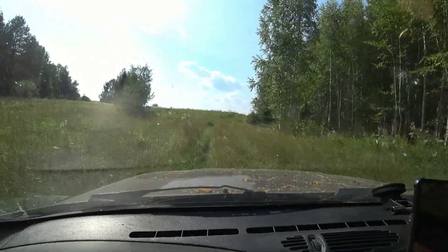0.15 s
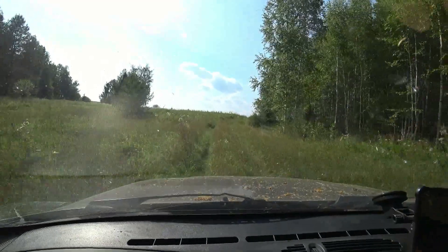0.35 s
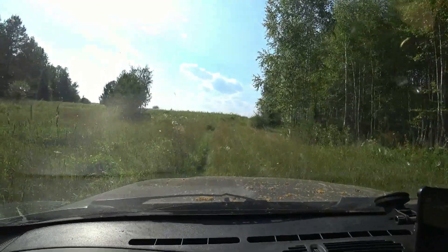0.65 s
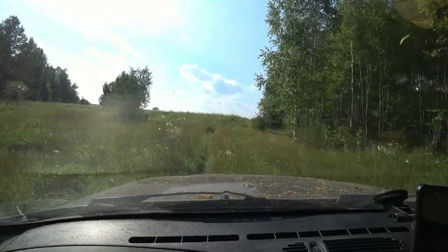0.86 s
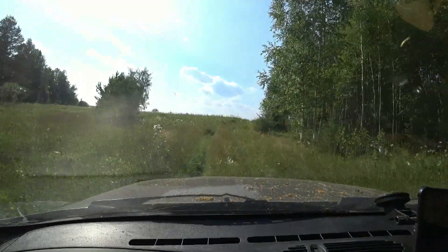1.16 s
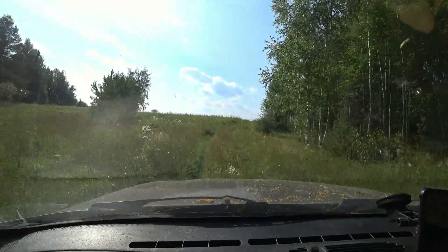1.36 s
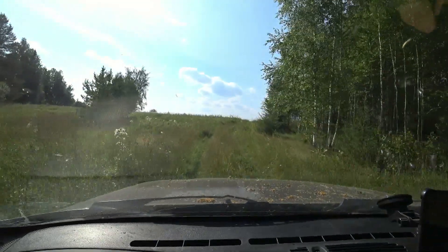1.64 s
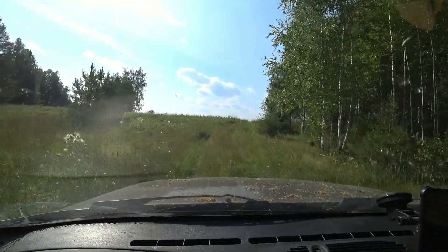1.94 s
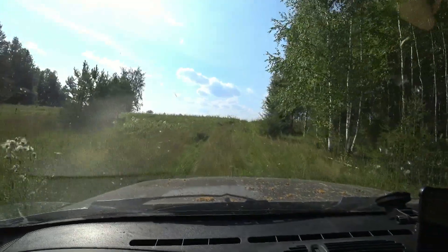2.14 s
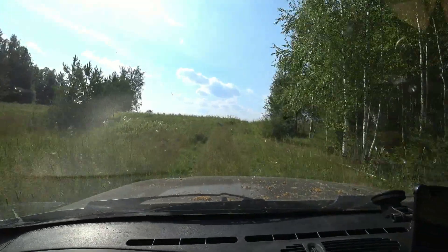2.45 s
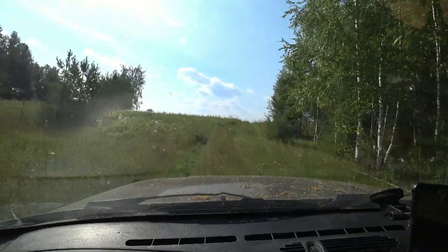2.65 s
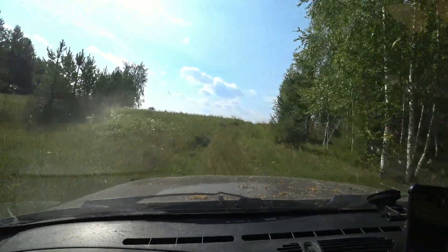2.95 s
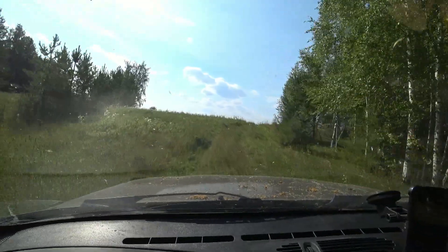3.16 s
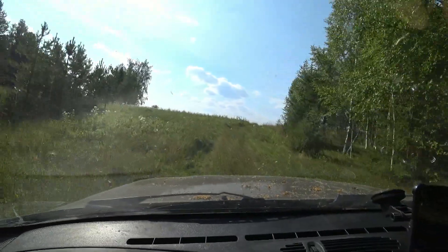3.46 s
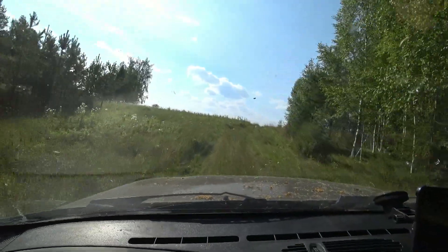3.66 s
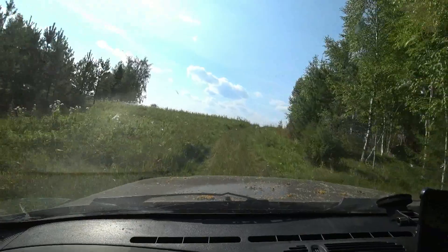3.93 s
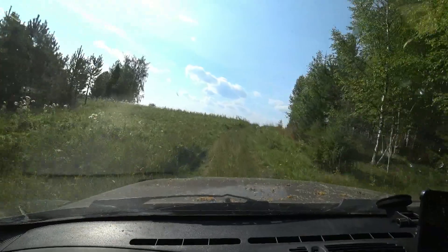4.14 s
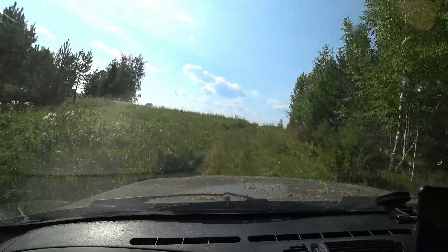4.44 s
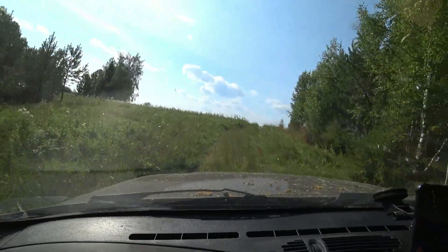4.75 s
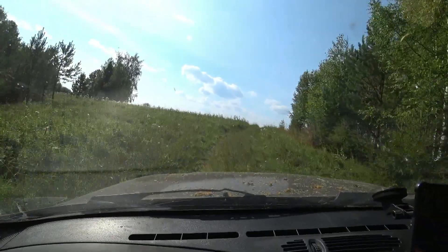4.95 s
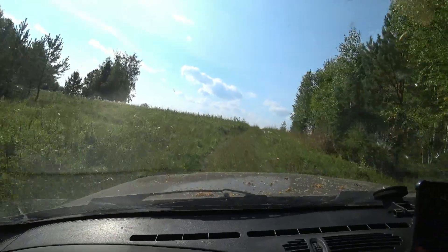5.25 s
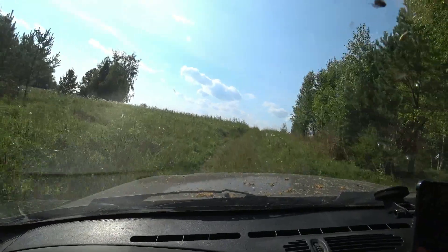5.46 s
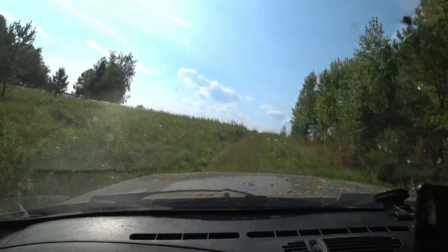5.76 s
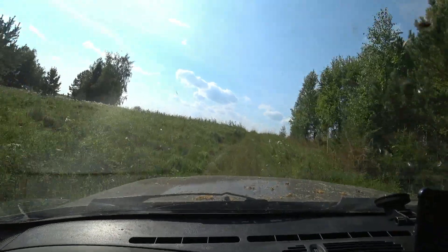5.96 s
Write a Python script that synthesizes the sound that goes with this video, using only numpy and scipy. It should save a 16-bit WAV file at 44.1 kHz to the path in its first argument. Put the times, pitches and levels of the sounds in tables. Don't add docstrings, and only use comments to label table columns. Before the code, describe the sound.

Inside a car crawling over a rough grassy track, low engine boom and wavering gear whine, with hard trim knocks, rattles and rumbling tyres.

```python
import sys
import numpy as np
from scipy import signal
from scipy.io import wavfile

SR = 44100
rng = np.random.default_rng(int(sys.argv[2]) if len(sys.argv) > 2 else 0)


def ratio_of_db(decibels):
    return 10 ** (np.asarray(decibels, float) / 20)


def file_out(sig):
    cols = np.atleast_2d(sig).T
    lim = np.clip(cols, -1, 1)
    pcm = np.round(lim * 32767).astype(np.int16)
    wavfile.write(sys.argv[1], SR, pcm)


N = 269010

# (time [s], mesh rate [Hz])
MESH_SPEED = [(0, 337), (.2, 328.6), (.6, 319), (1, 309.7), (1.4, 297.4), (2, 285.5), (2.4, 277),
              (2.8, 281), (3.2, 289.5), (3.6, 291.5), (4, 300), (4.4, 307.5), (4.7, 308), (4.85, 310.5),
              (5.17, 313), (5.45, 303), (5.8, 303), (6.1, 297)]
# (time [s], boom level [dB])
ENGINE_LOAD = [(0, -24), (.5, -20.5), (.8, -26.5), (1.2, -24.5), (1.5, -20.5), (2, -21.5), (2.4, -15),
               (2.9, -13.5), (3.6, -15), (4.3, -14), (5, -13), (5.5, -13.5), (6.1, -15.5)]
# (time [s], change [dB])
RUTS = [(.08, 3), (.2, -15), (.29, 5), (0.359, -12), (.44, 8), (.69, -16), (.98, -1), (1.15, 10.5),
        (1.42, -5), (1.63, -6), (1.72, 6), (1.801, -11), (1.87, 5), (1.95, -11), (2.16, 3), (2.28, -2.5),
        (2.36, -0.5), (2.49, -3.5), (2.58, 3.5), (2.66, -4.5), (4.38, -2.5), (4.62, -6.5), (4.68, 3.5),
        (4.88, -9.5), (5.1, -7.5), (5.37, -24), (5.61, -3), (5.84, -3.5), (6.03, -1)]
# (octave frequency [Hz], level re boom [dB])
CABIN_OCTAVE = [(59, -5), (62, -5.5), (64.5, -8.5), (66, -16), (68, -17), (72, -8)]
# (time [s], whine level [dB], depth of the dip in each shaft turn [dB])
GEAR_CONTACT = [(0, -28, -9), (.3, -29.5, -15), (.75, -28, -10), (.95, -25.5, -1), (1.25, -20, -6),
                (1.5, -21.5, -2.5), (2.1, -21, -1), (2.35, -26, -3), (2.9, -29.5, -11), (3.25, -28, -24),
                (3.45, -26.5, -2), (3.85, -25, -14), (4.4, -24, -17), (4.65, -23.5, -2), (4.95, -24.5, -13),
                (5.15, -24, 2), (5.6, -21.5, -5), (5.85, -21, -2)]
# (time [s], loss [dB])
SLACK = [(.26, -12), (.74, -14), (1.245, -9), (2.31, -8), (2.47, -10), (2.58, -19), (2.87, -8), (3.02, -17),
         (3.25, -14), (3.95, -8), (4.85, -16), (5.09, -7), (5.364, -14), (5.484, -7), (5.614, -9),
         (6.0, -32)]
# (mesh rate [Hz], left minus right [dB])
WHINE_LEAN = [(277, -3.5), (290, -8), (300, -7), (312, -3.5), (335, -1.5)]
# (mesh rate [Hz], left lead [rad])
WHINE_LEAD = [(277, 2.45), (290, 1.82), (305, 1.22), (320, .95), (337, .45)]
# (time [s], peak [dB], thump re peak [dB], crack re peak [dB])
KNOCKS = [(0.013, -3.5, -7.5, -21.5), (0.044, -11.5, -0.5, -22), (0.233, -20, 2.5, -28),
          (0.752, -20.5, -11, -25), (0.839, -6, -8, -23), (0.936, -20, -4, -22), (1.432, -7.5, -7, -19.5),
          (1.459, -15.5, -0.5, -29), (1.851, -25.5, -15, -21), (2.133, -20.5, -3.5, -17),
          (2.307, -20.5, -29, -35), (2.445, -17, -21, -32), (2.945, -12, -7.5, -27), (3.1, -14, -13, -36),
          (3.199, -19.5, -17, -36), (3.805, -23, -6, -22), (3.861, -23.5, -20, -33),
          (4.476, -11, -6.5, -30), (4.738, -22, -10, -37), (4.828, -20.5, -10, -20), (4.873, -21, -12, -33),
          (4.978, -12, -8.5, -39), (5.291, -19.5, -17, -20), (5.39, -12, -11, -33),
          (5.694, -6.5, -7, -20.5), (5.711, -16, -13, -24), (5.803, -9, -13, -18.5),
          (5.822, -19.5, 3.5, -18), (5.864, -21.5, -3, -30), (6.01, -22.5, -19.5, -27)]
# (frequency [Hz], level [dB], T60 [s])
PANEL_MODES = [(388.8, -5.5, 0.17), (411.7, -4, 0.13), (451.6, -5, 0.064), (522, -4, 0.033),
               (549.4, -6.5, .11), (626, -12, 0.064), (639.5, -14, 0.16), (982, -6, 0.044),
               (1110, -33, 0.059), (1257, -11, 0.036), (1347, -23, 0.1)]
# (frequency [Hz], level [dB], T60 [s])
FLOOR_MODES = [
    (154.6, -4, 0.38),
    (183.6, 4.5, 0.19),
]
# (time [s], peak [dB], ring [Hz], broad snap re ring [dB])
TICKS = [(0.492, -38.5, 1780, -7), (0.691, -46, 4230, 9), (0.702, -39, 1930, -2.5), (0.75, -41, 4570, -5),
         (0.889, -40.5, 2700, -5), (0.994, -40.5, 1830, -6), (1.092, -45, 7060, -3),
         (1.196, -44, 4680, -14), (1.499, -44, 6200, -4), (2.013, -44.5, 4430, 2), (2.036, -41.5, 3300, -1),
         (2.146, -33, 3600, -7), (2.196, -40, 5800, -6), (2.339, -36.5, 1640, -17), (2.501, -45, 4050, -4),
         (2.871, -32.5, 6340, -3.5), (2.91, -51, 7700, 14), (3.064, -45, 5300, -6),
         (3.557, -50.5, 6460, 8.5), (3.625, -40, 3320, -7), (4.127, -50, 6700, 8.5),
         (4.414, -43, 3190, -18), (4.574, -45, 3570, -14), (4.849, -38, 2780, -9), (5.047, -49.5, 2800, -8),
         (5.231, -45, 3544, -6), (5.287, -40.5, 5900, 1), (5.348, -38.5, 2760, -9), (5.897, -50, 4480, 4),
         (6.008, -39, 2670, -3.5)]
# (frequency [Hz], level [dB], T60 [s])
DASH_MODES = [(1650, -3, 0.037), (2260, -4, 0.023), (2760, -1, 0.033), (3270, 3.5, 0.029), (3520, 2, 0.02),
              (4630, -13.5, 0.017), (5660, -3, .03), (6200, 1.5, 0.027), (7300, -2, .03)]
# (time [s], level [dB])
ROUGHNESS = [(0, 8), (.1, 6), (.4, 6), (.55, 3), (.95, 3), (1.25, 3.5), (1.9, -1), (2.4, 3), (2.95, -2),
             (3.5, -3), (4.1, -2), (4.4, -3.5), (5.3, -0.5), (5.8, -3), (6.1, -3)]
ROUGHNESS_SHARE = [.3, 0.37, 0.65, 1.07]
# (time [s], swell [dB])
HUMPS = [
    (.03, 8.5),
    (.9, 2.5),
    (2.15, 3),
    (2.47, 3.5),
    (3.75, 3),
    (4.1, -2),
    (4.42, 2),
    (4.95, 1),
    (5.75, 4),
    (5.95, 1),
]
# (frequency [Hz], density [dB per Hz])
ROAD_COLOUR = [(82, -11), (110, -8.5), (190, -7.5), (250, -17), (320, -12), (420, -19), (680, -20.5),
               (830, -24.5), (1050, -26.5), (2200, -43.5), (3300, -44), (6300, -47), (8500, -50),
               (11200, -54)]
# (frequency [Hz], left-right likeness [0-1])
ROAD_LIKENESS = [(60, 0.66), (140, 0.78), (340, 0.26), (800, 0.53), (1910, 0.26), (4550, 0.6),
                 (10800, 0.38)]
# (frequency [Hz], left minus right [dB])
ROAD_LEAN = [(60, 6), (140, -6), (340, -2.5), (800, -1), (1910, 2), (4550, 0), (10800, 2)]
# (time [s], level [dB])
HEAVE = [(0, -26), (1, -21), (2, -23.5), (2.6, -31.5), (4.2, -23.5), (5, -22.5), (6.1, -26)]


def curves(rows):
    s, *columns = np.transpose(rows)
    return [np.interp(np.arange(N) / SR, s, column) for column in columns]


def at_hz(points, hz):
    table = np.array(points)
    return np.interp(np.log(hz), np.log(table[:, 0] + 1), table[:, 1])


def swells(rows, width_s):
    t = np.arange(N) / SR
    return sum(db * np.exp(-.5 * ((t - s) / width_s) ** 2) for s, db in rows)


def unit(x):
    return x / np.sqrt(np.mean(x ** 2) + 1e-20)


def drift(rate):
    r = np.exp(-80 * np.pi * rate / SR)
    slow = signal.lfilter([1], [1, -2 * r, r * r], rng.standard_normal(N // 40 + 2002))
    slow = slow[2000:]
    return np.interp(np.arange(N) / 40, np.arange(len(slow)), unit(slow))


def band(x, low_hz, high_hz, order=2):
    edges_hz = [low_hz, min(high_hz, SR / 2.2)]
    return signal.sosfilt(signal.butter(order, edges_hz, "band", fs=SR, output="sos"), x)


def ring(clicks, hz, t60):
    r, w = ratio_of_db(-60 / (t60 * SR)), 2 * np.pi * hz / SR
    return signal.lfilter([0, np.sin(w)], [1, -2 * r * np.cos(w), r * r], clicks + 1e-18)


def burst(t60):
    t = np.arange(int(.2 * SR)) / SR
    shared, left, right = rng.standard_normal((3, len(t)))
    rise = 1 - np.exp(-t / .0012)
    return (shared + .5 * np.array([left, right])) * ratio_of_db(-60 * t / max(t60, .01)) * rise


def add(out, piece, s):
    start = int(s * SR)
    out[:, start:start + piece.shape[1]] += piece[:, :N - start]


def engine():
    firing_hz = curves(MESH_SPEED)[0] / 9.31
    load_db = curves(ENGINE_LOAD)[0]
    boom_db = load_db + swells(RUTS, width_s=0.036)
    octave_db = load_db + at_hz(CABIN_OCTAVE, 2 * firing_hz + 1) + 1.5 * drift(5.3)
    phase = 2 * np.pi * np.cumsum(firing_hz) / SR + 0.37 * drift(2.3)
    octave_phase = 2 * phase - 2.7 + 0.65 * drift(4.4)
    boom = ratio_of_db(boom_db) * np.cos(phase) + ratio_of_db(octave_db) * np.cos(octave_phase)
    return np.sqrt(2) * boom * ratio_of_db([[-1.3], [1.2]])


def gears():
    teeth, turn_start_rad = 39.1, 2.0
    wobble_rad, wobble_per_s = .9, 7
    swing_rad, swing_start_rad = 0.32, 1.3
    mesh_hz = curves(MESH_SPEED)[0]
    right_db, dip_db = curves(GEAR_CONTACT)
    right_db = right_db + swells(SLACK, width_s=0.014)
    left_db = right_db + at_hz(WHINE_LEAN, mesh_hz + 1)
    lead = at_hz(WHINE_LEAD, mesh_hz + 1)

    steady = 2 * np.pi * np.cumsum(mesh_hz) / SR
    turn = steady / teeth + turn_start_rad
    phase = steady + wobble_rad * drift(wobble_per_s)
    phase = phase + swing_rad * np.sin(turn + swing_start_rad)

    trough = ratio_of_db(np.minimum(dip_db, 0))
    share = (1 - trough) / (1 + trough)
    upper = np.clip(0.7 + 0.45 * drift(1.95), 0, 1)
    sidebands = upper * np.exp(1j * turn) + (1 - upper) * np.exp(-1j * turn)
    tone = np.exp(1j * phase) * (1 + share * sidebands) / np.sqrt(1 + share ** 2)
    haze = ratio_of_db(-42.0) * (drift(12) + 1j * drift(12.3)) * np.exp(1j * 1.07 * phase)
    left = ratio_of_db(left_db) * tone * np.exp(1j * lead) + haze
    right = ratio_of_db(right_db) * tone + haze
    return np.sqrt(2) * np.real([left, right])


def knocks():
    rows, out = np.array(KNOCKS), np.zeros((2, N))
    bounces = ((.0009, -2), (.0031, -0.5), (.0075, -7.5), (.014, -12.5), (.024, -8.5))      # (lag [s], level [dB])
    panel_db = rows[:, 1] - 9.5
    floor_db = rows[:, 1] + rows[:, 2] - 8.5
    for modes, level_db in ((PANEL_MODES, panel_db), (FLOOR_MODES, floor_db)):
        for hz, mode_db, t60 in modes:
            clicks = np.zeros((2, N + 2000))
            for lag_s, bounce_db in bounces:
                chance = rng.normal(0, 1, (len(rows), 5))
                lag = lag_s * (1 + 0.229 * np.tanh(chance[:, 0]))
                at = ((rows[:, 0] + lag) * SR).astype(int)
                size = ratio_of_db(level_db + mode_db + bounce_db + 0.36 * chance[:, 1])
                if lag_s >= .005:
                    size *= np.sign(chance[:, 4])
                clicks[0, at] = size * ratio_of_db(-3.0 + 1.5 * chance[:, 2])
                clicks[1, at] = size * ratio_of_db(2.0 + 2.0 * chance[:, 3])
            out += ring(clicks[:, :N], hz, t60)
    out = signal.lfilter([.22], [1, -.78], out)
    for s, peak_db, _, crack_re_db in KNOCKS:
        crack_db = peak_db + crack_re_db
        add(out, ratio_of_db(peak_db + 6.5) * band(burst(0.18), 313, 533), s)
        add(out, ratio_of_db(peak_db - 12.0) * band(burst(0.081), 480, 1820), s)
        add(out, ratio_of_db(crack_db + 2.5) * band(burst(0.073), 3050, 4530), s)
        add(out, ratio_of_db(crack_db - 2.5) * band(burst(0.058), 5400, 6840), s)
    return out


def ticks():
    out = np.zeros((2, N))
    for s, peak_db, hz, snap_db in TICKS:
        t60 = 0.072 * (4000 / hz) ** 0.4
        puff = burst(t60) * ratio_of_db(peak_db) * np.sqrt(SR / hz)
        resonance = 0.66 * band(puff, hz / 1.21, hz * 1.113)
        snap = ratio_of_db(snap_db - 4.5) * band(puff, 650, 3360, order=1)
        add(out, resonance + snap, s)
    return out


def buzz(per_s, spread_db):
    born = rng.random(N) < per_s * ratio_of_db(5.5 * drift(7)) / SR
    strength = ratio_of_db(spread_db * np.minimum(rng.exponential(1, N), 4))
    touches = born * strength * rng.choice([-1, 1], N)
    dealt = rng.integers(0, len(DASH_MODES), N)
    sides = touches * ratio_of_db(5.4 * rng.normal(0, 1, N) * [[1], [-1]])
    rings = 0
    for k, (hz, db, t60) in enumerate(DASH_MODES):
        rings = rings + ring(ratio_of_db(db) * sides * (dealt == k), hz, t60)
    return ratio_of_db(-63 + ROUGHNESS_SHARE[2] * curves(ROUGHNESS)[0]) * unit(rings)


def grasshopper():
    start_s, end_s, edge_s, strokes_per_s = 0.072, .462, .008, 54.5
    t = np.arange(N) / SR
    strokes = (.5 + .5 * np.cos(2 * np.pi * strokes_per_s * (t - .445))) ** 1.8
    singing = np.clip(np.minimum(t - start_s, end_s - t) / edge_s, 0, 1)
    swell = ratio_of_db(-55 + 17 * np.minimum(t, end_s))
    shared, left, right = band(rng.standard_normal((3, N)), 7900, 10700, order=4)
    rasp = shared + 1.1 * np.array([left, right])
    gate = 0.37 + strokes * ratio_of_db(1.9 * drift(25))
    return swell * singing * unit(gate * rasp)


def road(patchy_db, grit_db):
    levels = [share * curves(ROUGHNESS)[0] for share in ROUGHNESS_SHARE]
    levels[0] = levels[0] + swells(HUMPS, width_s=0.071)
    edges = 70 * 2 ** np.arange(0, 7.8, 1 / 3)
    bumps, grit = drift(9), ratio_of_db(grit_db * drift(42))
    white = rng.standard_normal((2, 2, N))
    out = 0
    for k, (low, high) in enumerate(zip(edges, edges[1:])):
        hz = np.sqrt(low * high)
        zone = int(hz > 350) + int(hz > 1800) + int(hz > 7500)
        mid, side = band(white[k % 2], low, high)
        alike = np.clip(at_hz(ROAD_LIKENESS, hz), 0, 1)
        pair = np.sqrt(1 + alike) * mid + np.sqrt(1 - alike) * side * [[1], [-1]]
        patches = patchy_db * (0.76 * bumps + drift(7.9))
        gain = ratio_of_db(at_hz(ROAD_COLOUR, hz) + levels[zone] + patches)
        lean = ratio_of_db(at_hz(ROAD_LEAN, hz) / 2 * np.array([[1], [-1]]))
        out = out + gain * lean * pair * (grit if zone else 1)
    return ratio_of_db(-29.5) * unit(out)


def heave():
    lumps = unit(band(rng.standard_normal(N), 17.5, 51.0))
    return ratio_of_db(curves(HEAVE)[0]) * lumps * ratio_of_db([[-1.2], [1.2]])


def scene():
    drive = engine() + gears()
    trim = knocks() + ticks() + buzz(per_s=150, spread_db=-1.8)
    return drive + trim + grasshopper() + road(patchy_db=1.74, grit_db=-0.3) + heave()


def top_cut(x):
    return signal.sosfilt(signal.butter(12, 11400, fs=SR, output="sos"), x)


def record(dry):
    ceiling = 1.1
    rounded = ceiling * np.tanh(dry / ceiling)
    edge = signal.ellip(14, .5, 80, 11130, fs=SR, output="sos")
    beyond = signal.cheby2(8, 30, 11900, fs=SR, output="sos")
    mix = signal.sosfilt(np.vstack([edge, beyond]), rounded)
    return top_cut(mix)


dry = scene()
out = record(dry)
file_out(out)
```